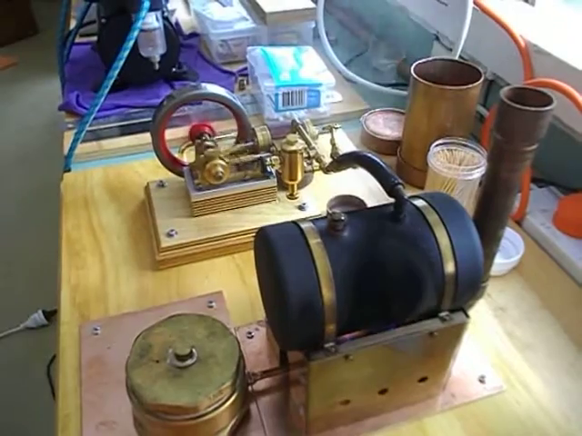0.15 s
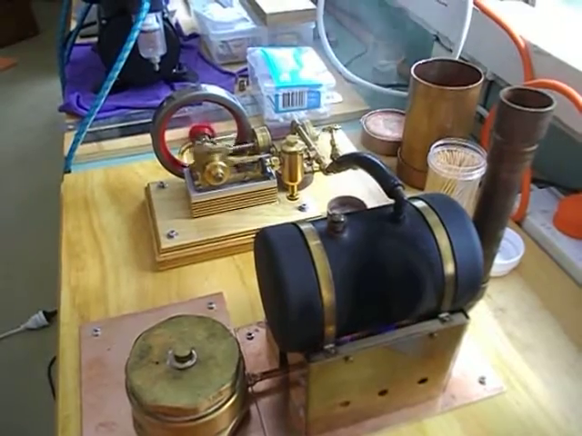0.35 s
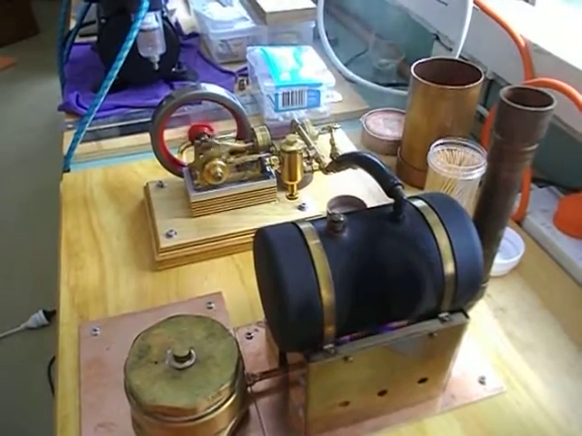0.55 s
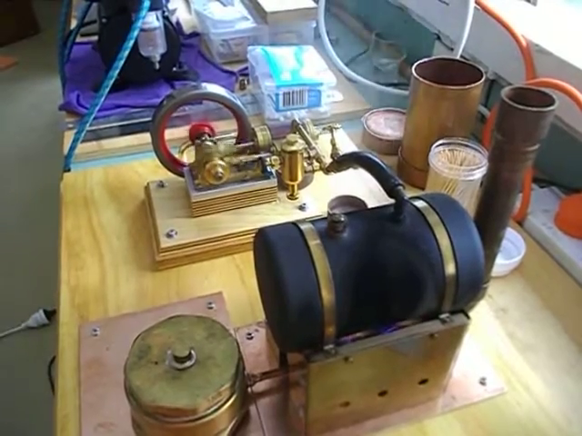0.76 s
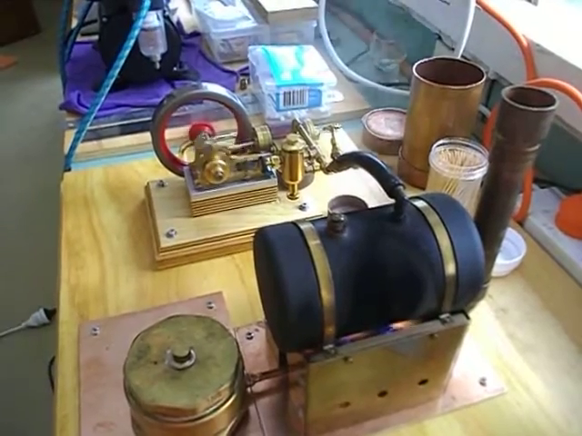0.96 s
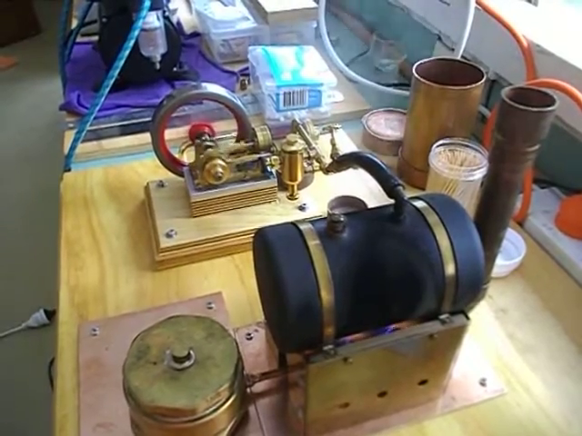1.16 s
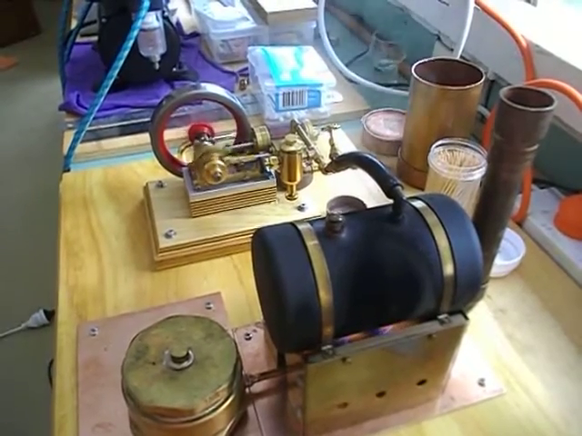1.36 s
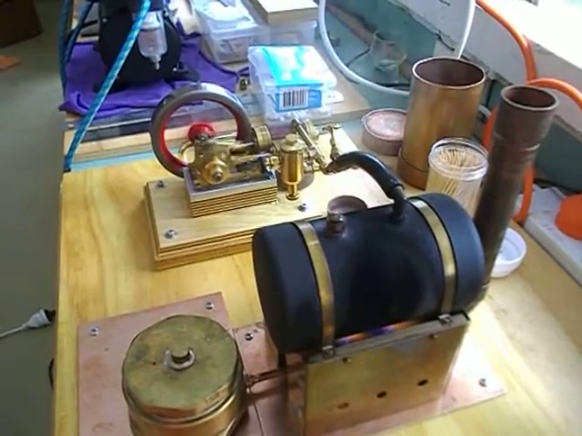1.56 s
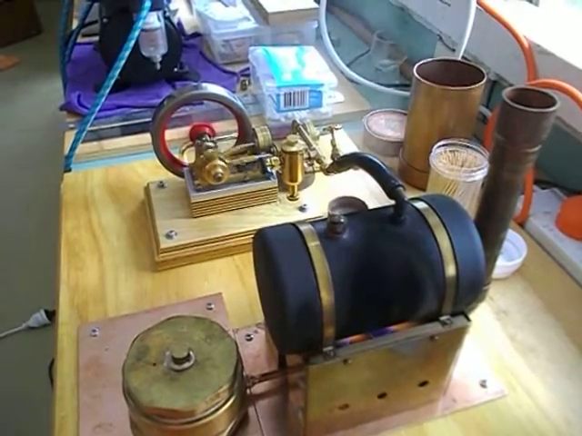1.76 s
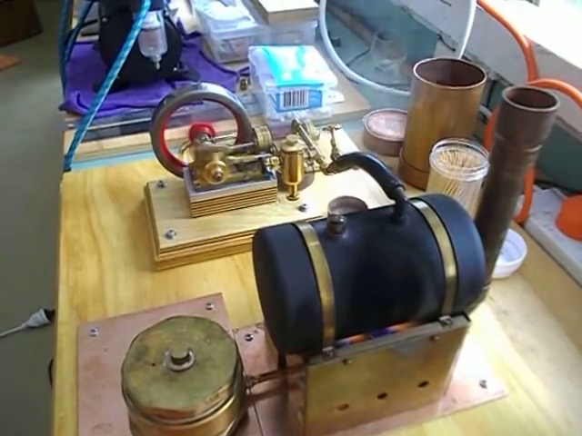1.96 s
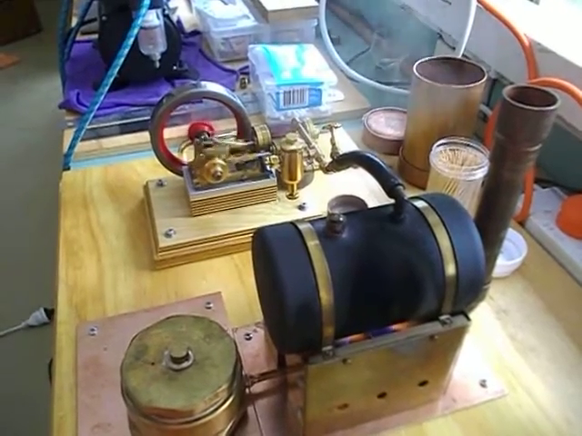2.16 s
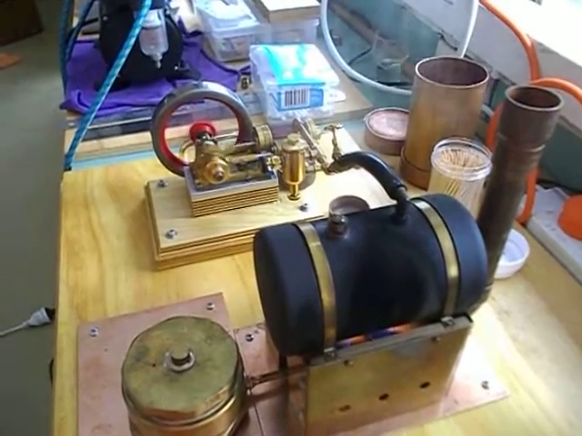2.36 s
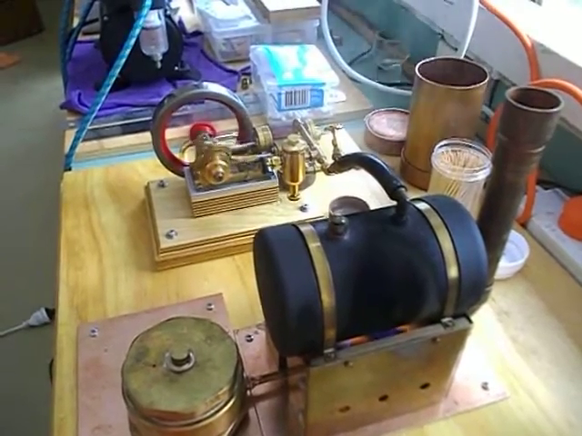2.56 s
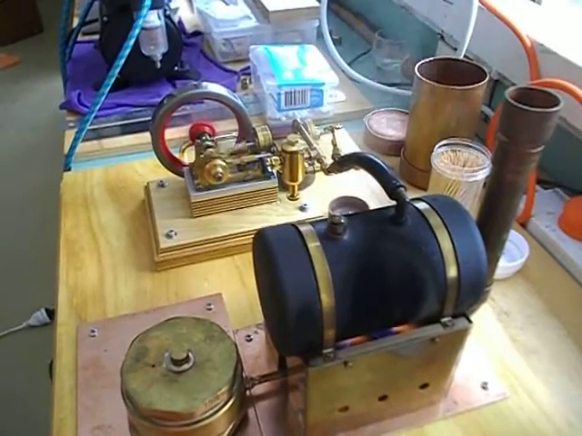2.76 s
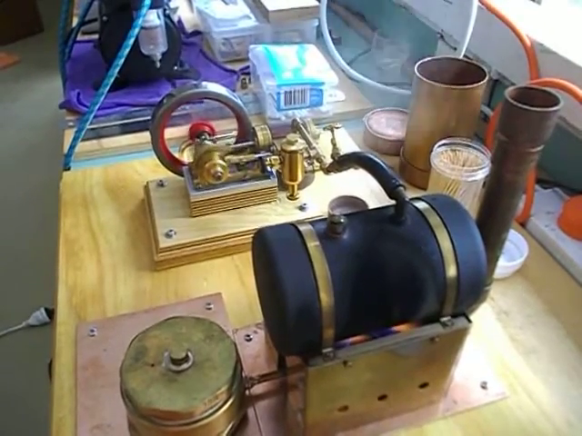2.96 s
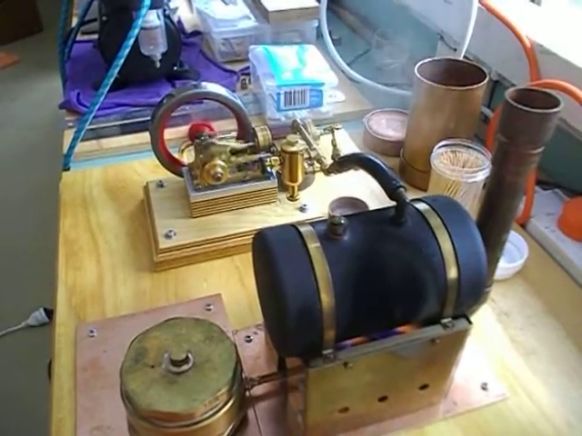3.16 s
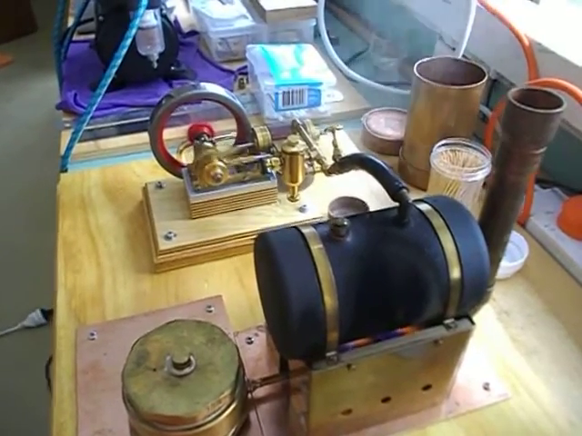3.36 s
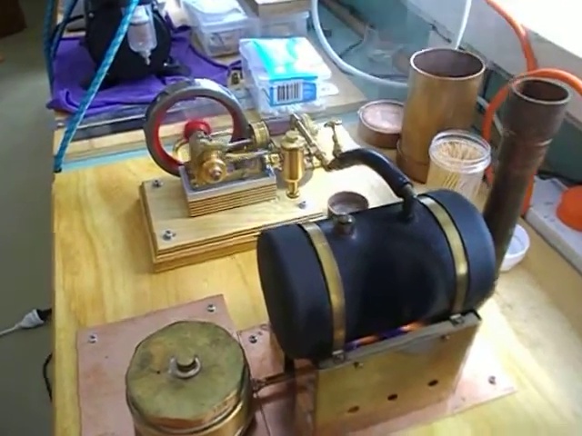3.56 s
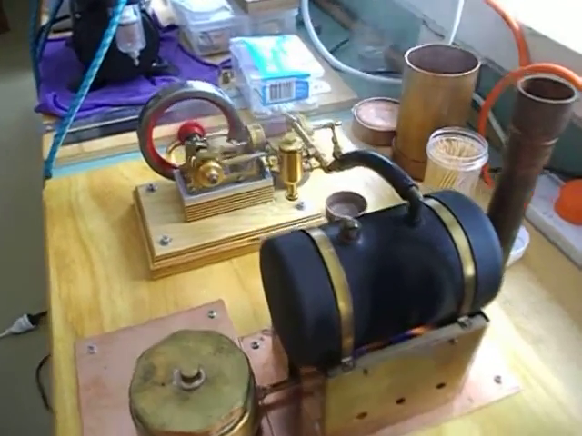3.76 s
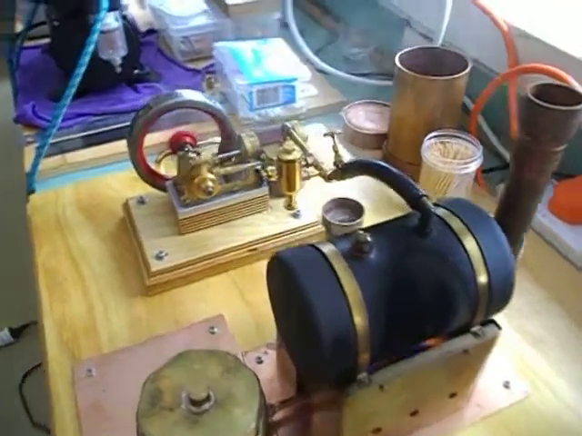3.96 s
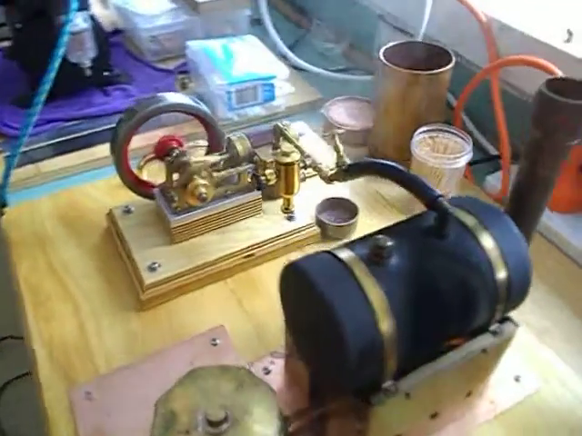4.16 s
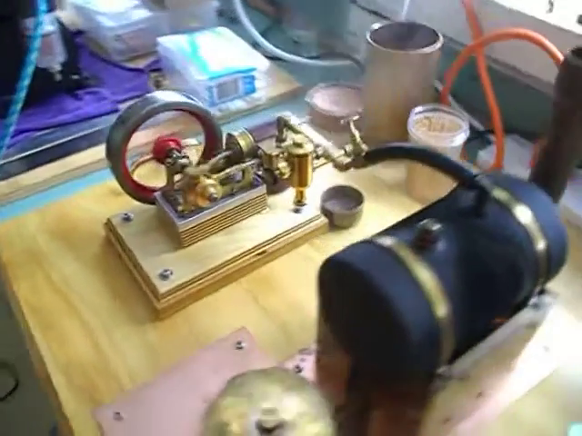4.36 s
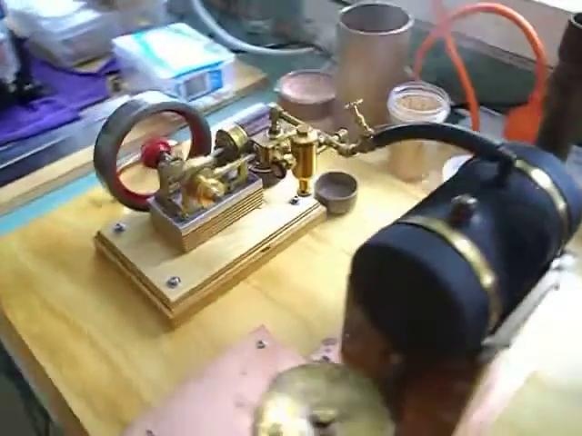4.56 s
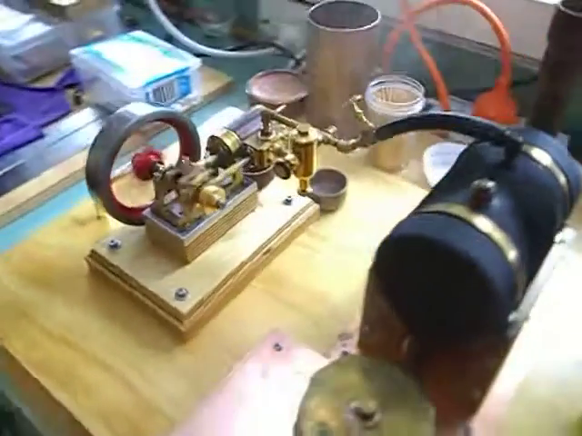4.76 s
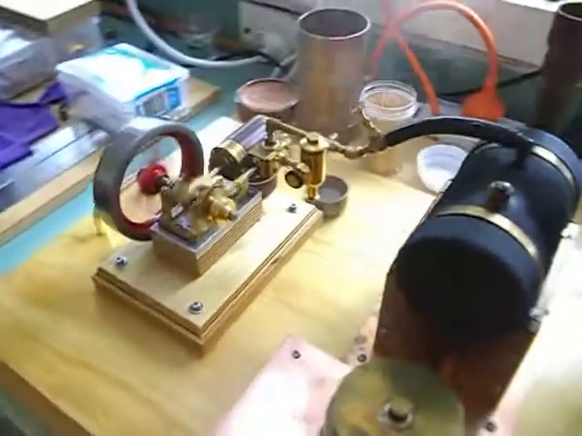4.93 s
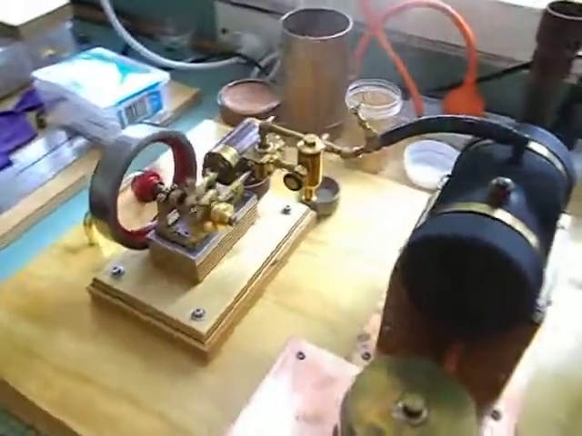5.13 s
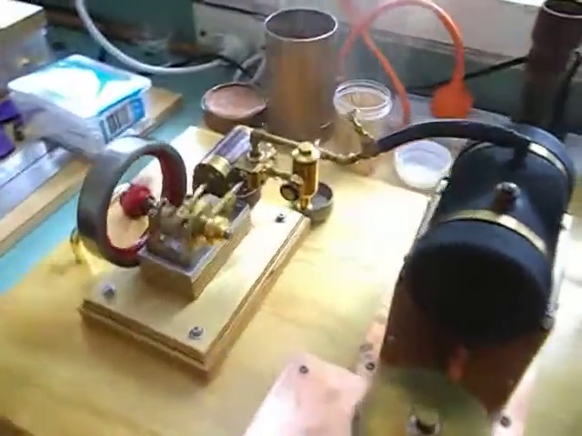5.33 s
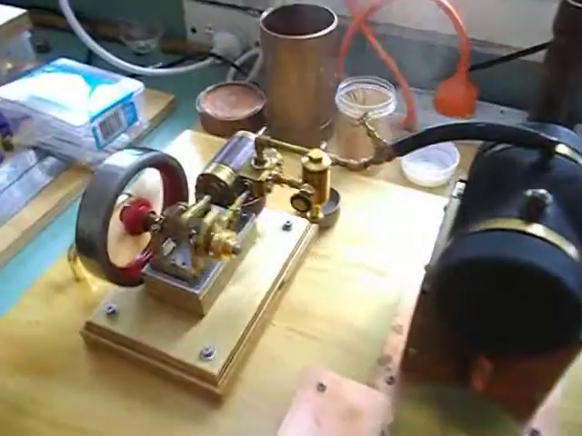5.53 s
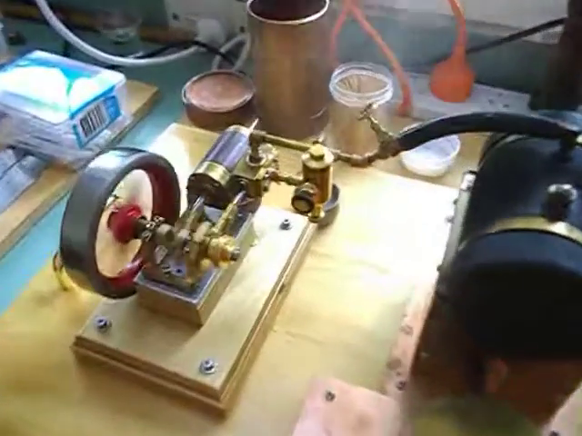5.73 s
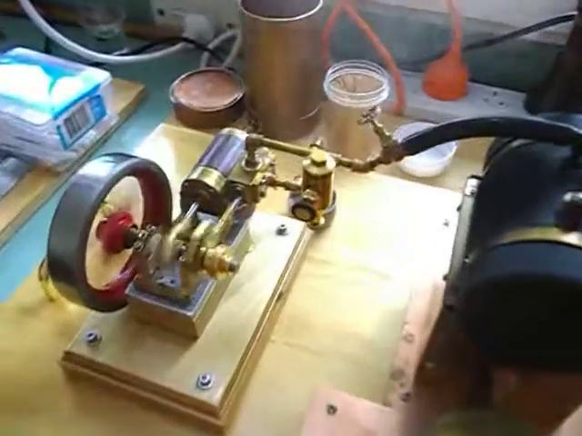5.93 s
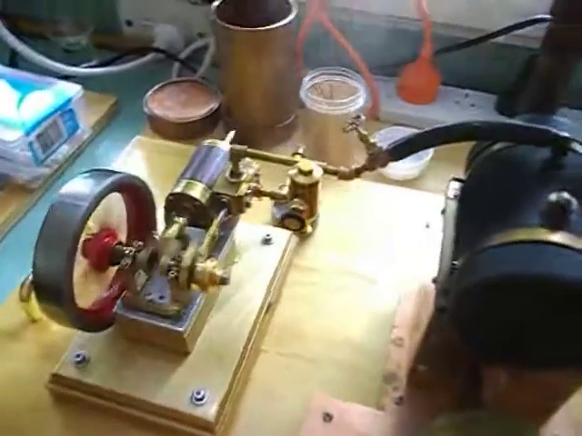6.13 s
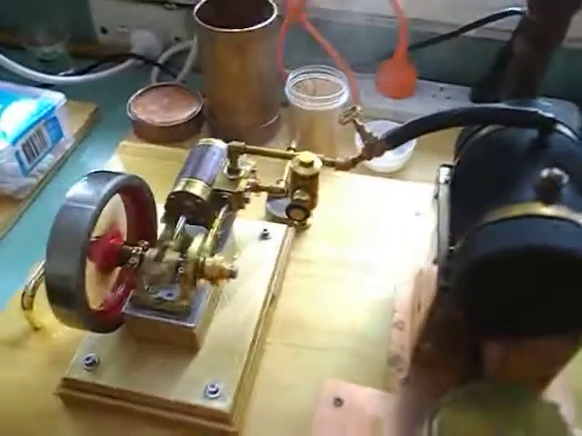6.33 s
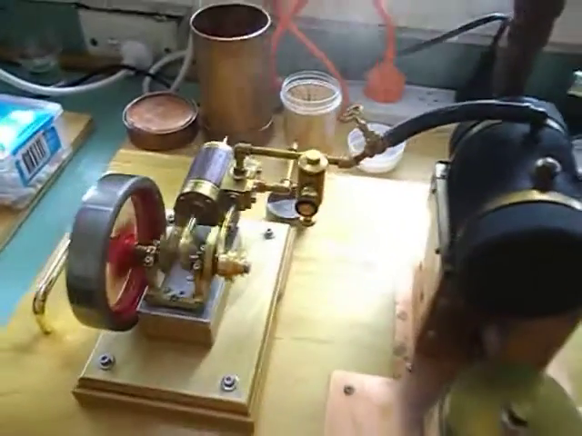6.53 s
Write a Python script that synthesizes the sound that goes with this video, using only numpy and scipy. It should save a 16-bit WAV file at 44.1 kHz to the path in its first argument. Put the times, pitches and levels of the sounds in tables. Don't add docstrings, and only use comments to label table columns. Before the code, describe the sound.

From the first moment a small steam engine is already running on a wooden bench, at roughly eight turns a second, and it never stops. Each turn brings a brief spitting puff of steam and two short, dry brass knocks, merging into a rapid chuffing clatter. Leaking steam hisses brightly throughout, pulsing slightly with the turns. Below lie a soft gas-flame roar, room rumble and a low, flickering flue drone. A thin steady high whistle swells faintly around 1.5 s and nearly vanishes by 4.2. Until about 3.8 s the sound is fairly distant and even. From 4 to 5 s the microphone moves round and closer: narrow tones in the hiss glide up and down, and sharp wet spits jump out around 4.5. From 5 to 6.6 s puffs are stronger, hiss fullest near 5.25 then easing, the speed almost unchanged; the drone rises at the end. Close, dull workshop reflections.

```python
import sys
import numpy as np
from scipy import signal
from scipy.fft import rfft, irfft, next_fast_len
from scipy.io import wavfile
from scipy.ndimage import uniform_filter1d

SR = 44100
rng = np.random.default_rng(int(sys.argv[2]) if len(sys.argv) > 2 else 0)


def generate_wav(signal):
    frames = np.transpose(np.atleast_2d(signal))
    scaled = np.clip(frames, -1, 1) * 32767
    pcm = np.round(scaled).astype(np.int16)
    wavfile.write(sys.argv[1], SR, pcm)


def volts(x):
    e = np.asarray(x, float) / 20
    return 10 ** e


N = 290619


def rms_one(x):
    return x / np.sqrt(np.mean(x ** 2) + 1e-20)


def in_time(rows):
    s, *columns = np.transpose(rows)
    return [np.interp(np.arange(N) / SR, s, c) for c in columns]


def drift(rate):
    r = np.exp(-40 * np.pi * rate / SR)
    slow = signal.lfilter([1], [1, -2 * r, r * r], rng.standard_normal(N // 20 + 2002))[2000:]
    return np.interp(np.arange(N) / 20, np.arange(len(slow)), rms_one(slow))


def white_spectra(count):
    return rfft(rng.standard_normal((count, 2 * next_fast_len(N // 2 + 1))))


def coloured(white, points, low_hz=0, high_hz=30000):
    hz = np.maximum(np.linspace(0, SR / 2, len(white)), 1)
    table = np.array(points)
    gain = volts(np.interp(np.log(hz), np.log(table[:, 0]), table[:, 1]))
    edges = np.clip(np.minimum(hz - low_hz, high_hz - hz) / 120 + .5, 0, 1)
    return rms_one(irfft(white * gain * np.sqrt(edges))[:N])


def resonance(x, hz, width):
    r = np.exp(-np.pi * width / SR)
    top = np.array([1, 0, -1]) * (1 - r * r) / 2
    return signal.lfilter(top, [1, -2 * r * np.cos(2 * np.pi * hz / SR), r * r], x)


def twice_resonant(x, hz, width):
    return resonance(resonance(x, hz, width), hz, width)


def ring(clicks, hz, t60):
    r, w = volts(-60 / (t60 * SR)), 2 * np.pi * hz / SR
    return signal.lfilter([0, np.sin(w)], [1, -2 * r * np.cos(w), r * r], clicks + 1e-18)


def ridge(rows, half_width_hz):
    hz, ridge_db = in_time(rows)
    low_pass = signal.butter(2, half_width_hz, fs=SR, output="sos")
    band = signal.sosfilt(low_pass, rng.standard_normal((2, N)))
    phase = 2 * np.pi * np.cumsum(hz) / SR
    flutter_db = 1.2 * drift(17)
    return volts(ridge_db + flutter_db) * rms_one(band[0] * np.cos(phase) + band[1] * np.sin(phase))


def workshop(x):
    t = np.arange(int(.15 * SR)) / SR
    tail = rng.standard_normal(len(t)) * volts(-60 * t / 0.16) * (t > .003)
    return signal.fftconvolve(x, tail / np.sqrt(np.sum(tail ** 2)))[:N]


# [t/s, f/Hz, level/dB, half length/s]
SWELLS = [(0.124, 169.8, -48, 0.15), (.6, 163.3, -54, .15), (1.3, 137, -55, 0.1), (1.4, 82.8, -47, 0.26),
          (2.2, 82.1, -40.5, .3), (2.55, 164.8, -48.5, 0.11), (3.4, 132.1, -51.5, 0.42),
          (4.703, 172, -53, 0.14), (5.251, 78.3, -47, .12), (5.949, 76.3, -46, 0.14),
          (6.056, 134, -56, .15), (6.308, 233, -53.5, 0.16), (6.469, 133.8, -44, 0.085)]


def singing():
    t, out = np.arange(N) / SR, np.zeros(N)
    for s, hz, db, half in SWELLS:
        out += np.sqrt(2) * volts(db) * np.exp(-((t - s) / half) ** 2) * np.sin(2 * np.pi * hz * t)
    return out


# [t/s, f/Hz, level/dB]
DRONE = [(0, 64.9, -38.5), (.4, 64.5, -35.5), (.71, 63.3, -37.5), (1.17, 66.3, -32.5), (1.5, 68, -38),
         (1.69, 68.74, -35.5), (1.85, 64.65, -41), (2.18, 65.2, -33.5), (2.83, 65, -33),
         (3.19, 64.2, -34.5), (3.52, 63.13, -32), (4.16, 65.13, -33), (4.68, 62.74, -35.5),
         (5.16, 63.3, -39.5), (5.56, 63.6, -32.5), (5.91, 69.34, -38.5), (6.22, 68.6, -30.5),
         (6.59, 73.2, -26)]
# [t/s, half length/s, depth/dB]
FALTERS = [(0.567, 0.081, 34), (0.967, 0.085, 15), (1.28, 0.024, 28), (1.608, 0.02, 14), (2.66, 0.097, 16),
           (3.861, 0.08, 10), (4.423, 0.11, 7.5), (4.746, 0.08, 1), (5.413, 0.065, 15), (5.626, 0.026, 10),
           (5.82, 0.039, 15), (6.059, 0.071, 20), (6.174, 0.02, 11), (6.268, 0.04, 12), (6.41, 0.049, 16),
           (6.556, 0.069, 21)]


def flue_drone():
    hz, drone_db = in_time(DRONE)
    for s, half, depth_db in FALTERS:
        drone_db = drone_db - depth_db * np.exp(-((np.arange(N) / SR - s) / half) ** 2)
    level = np.sqrt(2) * volts(drone_db - 3.8 + 2.4 * drift(12))
    return level * np.sin(2 * np.pi * np.cumsum(hz + 1.8 * drift(12)) / SR)


# [t/s, level/dB]
FLAME = [(0, -41), (.3, -42.5), (.9, -43), (1.36, -41.5), (2, -42.5), (2.5, -42), (3.7, -42), (5.85, -41),
         (6.08, -39.5), (6.59, -42)]
# [f/Hz, level/dB per Hz]
ROAR = [(120, -19), (200, -3.5), (398, -8), (514, -8.5), (623, -0.5), (833, -1), (1040, 0), (1180, -6.5),
        (1510, -14.5), (1850, -8), (2690, -8.5), (3000, -8.5), (3270, -13), (3600, -16.5), (4680, -5.5),
        (7920, -120)]
# [f/Hz, level/dB per Hz]
RUMBLE = [(5, -34), (12, -3.5), (22, -6.5), (30, -2.5), (50, -14), (100, -16), (150, -20.5), (200, -30),
          (300, -38.5), (500, -99)]
# [f/Hz, width/Hz, level/dB]
HUMS = [(67.95, 7.7, -47), (82.2, 8.7, -50), (137, 23.4, -51.5), (167.9, 18, -56), (234.7, 30, -63.5)]
# [f/Hz, width/Hz, depth/0-1]
NULLS = [(55, 5, .25), (152.3, 9.1, .8), (109, 10, 0.22)]


def burner():
    draught_db = in_time(DRONE)[1]
    draught_db = draught_db - draught_db.mean()
    for_roar, for_rumble = white_spectra(2)
    roar = volts(in_time(FLAME)[0] + 0.8 * drift(29)) * coloured(for_roar, ROAR)
    rumble_db = -39.8 + .3 * draught_db + 1.8 * drift(4.1)
    low = roar + volts(rumble_db) * coloured(for_rumble, RUMBLE, low_hz=-60)
    white = rng.standard_normal(N)
    for hz, width, db in HUMS:
        hum_db = db + 0.47 * draught_db + 1.4 * drift(2.0)
        low = low + volts(hum_db) * rms_one(twice_resonant(white, hz, width))
    for null_hz, width, depth in NULLS:
        low = low - np.clip(depth, 0, 1) * resonance(low, null_hz, width)
    return low + flue_drone() + singing()


# [t/s, level/dB]
GLAND = [
    (0, -53),
    (1.5, -48.5),
    (3.5, -50.5),
    (4.2, -61),
    (6.59, -58),
]


def gland():
    return ridge([(s, 3702, db) for s, db in GLAND], half_width_hz=92)


# [t/s, f/Hz, level/dB]
SWEEP = [(4.1, 9200, -60), (4.22, 9350, -41), (4.33, 9620, -37), (4.45, 9950, -38), (4.6, 10430, -42),
         (4.85, 10300, -43), (5.0, 10100, -41), (5.4, 10460, -55)]
# [t/s, f/Hz, level/dB]
SINKING = [(3.9, 6800, -60), (4.03, 6650, -38), (4.25, 6450, -42), (4.4, 6250, -33), (4.55, 6180, -37),
           (4.7, 6100, -37), (4.9, 5950, -58)]
# [t/s, f/Hz, level/dB]
STAYING = [(4.6, 6570, -60), (4.8, 6620, -41), (5.3, 6550, -42), (5.9, 6550, -38), (6.3, 6470, -36),
           (6.59, 6340, -41)]
# [t/s, f/Hz, level/dB]
SLIDING_HIGH = [(3.88, 9200, -60), (3.98, 9120, -41), (4.15, 8950, -38), (4.27, 8700, -39),
                (4.4, 8500, -58)]
SLIDING_LOW = [(3.85, 6150, -58), (3.97, 6000, -43), (4.15, 5800, -42), (4.3, 5720, -42), (4.42, 5700, -58)]


def passing_ridges():
    out = ridge(SWEEP, half_width_hz=140) + ridge(SINKING, half_width_hz=89)
    for rows in (STAYING, SLIDING_HIGH, SLIDING_LOW):
        out = out + ridge(rows, half_width_hz=110)
    return out


# [turn number, t/s at which the valve rod reverses]
CRANK = [
    (0, .0917),
    (25, 3.1799),
    (52, 6.5399),
]
# [t/ms from first knock, dull level/dB, bright level/dB]
STROKE = [(-31.5, -2.5, -0.5), (-11.5, -3, -3), (-14, 2.5, 4), (2.5, -1.5, 0.5), (19, 1, 1),
          (39.5, -3.5, 1.5), (48, -3.5, -2), (72, -3.5, -0.5), (92, 0.5, -0.5)]
# [f/Hz, level/dB per Hz]
LOW_FAR = [(2600, -47.0), (3270, -17.0), (3490, -9.0), (3700, -5.0), (4090, -11.0), (4260, -8.0),
           (5000, -12.0), (5340, -10.0), (5640, -3.0), (5860, -4.0), (6330, 0.0), (6800, -8.0),
           (6980, -9.0), (7320, -6.0)]
HIGH_FAR = [(7190, -4.0), (7410, -2.0), (7800, -5.0), (7920, -2.0), (8910, -3.0), (9040, 0.0), (9220, -1.0),
            (9470, -9.0), (10120, -8.0), (10510, -14.0), (11110, -9.0), (11540, -10.0), (12060, -6.0),
            (12360, -9.0)]
LOW_PASSING = [(2600, -47.0), (3270, -17.0), (3660, -14.0), (3830, -9.0), (4610, -13.0), (5340, -9.0),
               (5810, -4.0), (5940, -6.0), (6330, 0.0), (6500, -2.0), (6630, -6.0), (6800, -5.0),
               (7060, -7.0), (7320, -11.0)]
HIGH_PASSING = [(7190, -5.0), (7320, -7.0), (8230, -6.0), (8270, -5.0), (8830, -1.0), (9170, -3.0),
                (9260, -1.0), (9470, 0.0), (10030, -3.0), (10420, -11.0), (10680, -12.0), (11630, -8.0),
                (12270, 0.0), (12360, -1.0)]
LOW_BESIDE = [(2600, -51.0), (3270, -21.0), (3660, -14.0), (4350, -10.0), (4570, -12.0), (5120, -7.0),
              (5560, -7.0), (5860, -1.0), (6290, -6.0), (6500, 0.0), (6680, -2.0), (6930, -8.0),
              (7150, -7.0), (7320, -11.0)]
HIGH_BESIDE = [(7190, -1.0), (7360, -6.0), (7580, -7.0), (7750, -5.0), (8660, -2.0), (9040, -4.0),
               (9260, -1.0), (9470, -2.0), (10160, -2.0), (10380, -4.0), (11540, 0.0), (11630, -2.0),
               (12320, 0.0), (12360, -1.0)]
LOW_BEHIND = [(2600, -48.0), (3270, -18.0), (3490, -14.0), (3880, -11.0), (3960, -12.0), (4780, -11.0),
              (5000, -8.0), (5340, -12.0), (5680, -5.0), (5990, -9.0), (6370, -1.0), (6500, 0.0),
              (7020, -10.0), (7320, -12.0)]
HIGH_BEHIND = [(7190, -6.0), (8530, -1.0), (8740, -4.0), (8960, 0.0), (9300, -6.0), (9600, -2.0),
               (10080, -10.0), (10340, -4.0), (10640, -4.0), (10810, -9.0), (11070, -8.0), (11630, -1.0),
               (11970, -9.0), (12360, -3.0)]


def leak(place, levels_db):
    turns, reversals = np.transpose(CRANK)
    knock_s = np.interp(np.arange(turns[-1] + 1), turns, reversals) - .0421
    now = np.arange(N) / SR
    turn = np.clip(np.searchsorted(knock_s - .04, now) - 1, 0, len(knock_s) - 1)
    since_ms = (now - knock_s[turn]) * 1000
    ms, dull_db, bright_db = np.transpose(STROKE)
    pulse_db = [np.interp(since_ms, ms, db) for db in (dull_db, bright_db, bright_db)]
    sputter_db = .5 * drift(40) + .3 * drift(150)
    white = white_spectra(4)
    shares = [np.sqrt(np.clip(1 - abs(place - k), 0, 1)) for k in range(4)]
    lower = (LOW_FAR, LOW_PASSING, LOW_BESIDE, LOW_BEHIND)
    upper = (HIGH_FAR, HIGH_PASSING, HIGH_BESIDE, HIGH_BEHIND)
    slices = [(lower, 0, 5300), (lower, 5300, 7250), (upper, 7250, 30000)]
    out = 0
    for (spectra, low_hz, high_hz), level_db, stroke_db in zip(slices, levels_db, pulse_db):
        jet = 0
        for share, noise, points in zip(shares, white, spectra):
            jet = jet + share * coloured(noise, points, low_hz, high_hz)
        out = out + volts(level_db + stroke_db + sputter_db + .8 * drift(45)) * jet
    return out


# [t/s at its height, level/dB]
PUFFS = [(0.0389, -25), (0.1633, -19.5), (0.286, -21.5), (0.4101, -28), (0.5318, -23.5), (0.6588, -23),
         (0.7804, -20.5), (0.9045, -21.5), (1.0271, -20.5), (1.1538, -30), (1.2765, -20), (1.3978, -19.5),
         (1.523, -20.5), (1.644, -17.5), (1.7685, -22), (1.8926, -21.5), (2.0149, -23), (2.1389, -24),
         (2.2624, -23), (2.3866, -22), (2.5096, -20.5), (2.6312, -21.5), (2.7552, -19), (2.8803, -19),
         (3.006, -21), (3.1309, -25), (3.2483, -25), (3.377, -20.5), (3.499, -17.5), (3.6223, -30),
         (3.749, -21.5), (3.8723, -22.8), (3.9992, -20), (4.1231, -20), (4.2466, -25), (4.375, -20.5),
         (4.4915, -15), (4.6206, -20), (4.7497, -26.8), (4.8677, -36), (4.9981, -17.5), (5.1161, -16),
         (5.2454, -15), (5.369, -20), (5.4953, -15), (5.6164, -17.5), (5.7405, -15.5), (5.8654, -16.5),
         (5.9887, -16), (6.1157, -17), (6.2397, -17), (6.3649, -19), (6.4883, -18)]
# [t/s, peak level/dB]
SPITS = [(0.0594, -18), (1.5464, -19), (1.6671, -16), (1.7149, -18), (1.8114, -20), (1.9154, -19),
         (2.6574, -20), (3.2767, -21), (3.4617, -23), (3.6694, -18), (4.2766, -16), (4.4494, -18),
         (4.5236, -7), (4.6514, -11), (4.7074, -16), (4.7724, -11), (4.9334, -14), (5.1934, -18),
         (5.3896, -18), (5.4414, -11), (5.5182, -8), (5.8875, -13), (6.0114, -13), (6.068, -22)]
# [f/Hz, width/Hz, level/dB]
PUFF_FAR = [(5800, 230, -24), (6150, 520, 6), (8280, 420, 1.5), (9130, 200, 3.5), (10260, 330, -18),
            (11300, 990, -31)]
PUFF_NEAR = [(5200, 390, -23), (5710, 280, 11.5), (6440, 550, 12.5), (7300, 160, -12), (8900, 890, 5),
             (9700, 542, -3), (10200, 960, -1), (11600, 1000, 3)]


def valve_jet(white, peaks):
    out = np.zeros(N)
    for k, (hz, width, db) in enumerate(peaks):
        out += (-1) ** k * volts(db) * twice_resonant(white, hz, 1.5 * width)
    return rms_one(out)


def puffs(near):
    spit_lag_s, spit_loss_db, lead_s = 0.0046, 11, .0015
    s, puff_db = np.transpose(PUFFS + [(s + spit_lag_s, db - spit_loss_db) for s, db in SPITS])
    around = np.arange(-600, 900)
    ms = around / SR * 1000
    swell = np.exp(-(ms / np.where(ms < 0, 6.5, 5.5)) ** 2)
    spit = np.exp(-((ms + .7) / np.where(ms < -.7, 1.0, 1.7)) ** 2)
    wetness = np.clip((puff_db[:, None] + 18) / 11.4, .1, 1.3)
    at = ((s - lead_s) * SR).astype(int)[:, None] + around
    gate = np.zeros(N)
    np.add.at(gate, np.clip(at, 0, N - 1), volts(puff_db - 5.5)[:, None] * (.9 * swell + 1.2 * wetness * spit))
    white = rng.standard_normal(N)
    jet = np.sqrt(1 - near) * valve_jet(white, PUFF_FAR) + np.sqrt(near) * valve_jet(white, PUFF_NEAR)
    return gate * jet / np.sqrt(uniform_filter1d(jet ** 2, size=260))


# [t/s, level/dB]
STEAM = [(0, -28.5), (.5, -29), (1.5, -29.5), (2.5, -29.5), (3, -29), (3.8, -29), (4.1, -30), (4.45, -29),
         (4.8, -26.5), (5.25, -24.5), (5.6, -26), (6, -27.5), (6.59, -28.5)]
# [microphone place, dull level/dB, middle level/dB, bright level/dB]
BALANCE_AT = [
    (0, -8.5, -5, -2),
    (1, -6.5, -3, 4),
    (2, -9, -4, 1.5),
    (3, -7, -4, 2.5),
]
# [t/s, depth/0-1]
CANCEL = [(0, 0.17), (4.9, 0), (5.15, .5), (5.45, .4), (5.65, .75), (5.85, 0.3), (6.05, 0), (6.59, 0)]


def steam(place, near):
    steam_db, = in_time(STEAM)
    slices_db = [steam_db + np.interp(place, np.arange(4), db) for db in np.transpose(BALANCE_AT)[1:]]
    out = puffs(near) + leak(place, slices_db) + passing_ridges() + gland()
    return out - np.clip(in_time(CANCEL)[0], 0, 1) * resonance(out, 7420, 220)


# [t/s, f/Hz, level/dB, rise/s, t60/s]
BOOMS = [(.275, 1012, -27.5, 0.013, 0.15), (1.105, 1007, -27, 0.015, 0.15), (5.27, 1250, -33, .01, .1),
         (5.76, 690, -28, .01, 0.09), (3.637, 930, -32, 0.0019, .04), (3.888, 680, -29, .002, .04),
         (1.284, 935, -25, 0.00089, 0.035), (4.631, 680, -19.5, 0.0013, 0.019),
         (6.1, 759, -41, .002, 0.041), (5.793, 693, -32, 0.0022, .05)]


def board():
    out, age = np.zeros(N), np.arange(5000) / SR
    for s, hz, db, rise, t60 in BOOMS:
        at = int(s * SR)
        swell = 1 - np.exp(-age / rise)
        out[at:at + len(age)] += volts(db - 60 * age / t60) * swell * np.sin(2 * np.pi * hz * age)
    return out


# [f/Hz, t60/s, first knock level/dB far, near, second knock level/dB far, near]
FRAME = [(660, 0.02, -16, -5, -3, 5), (980, 0.018, 0, -8, -21, -9), (1057, 0.018, -2, -5, 3, 4),
         (1290, 0.012, -11, -20, -6, -16), (1820, 0.018, -2.5, -33, -16, -18),
         (1840, 0.017, -9, -33, 3, -17), (2010, 0.008, -12, -25, -25, -4), (2190, 0.012, 0, -17, -5, -1),
         (2390, 0.008, -7, -3, -8, 0), (2760, 0.008, 0, 3.5, -22, -5), (2983, 0.014, 4, -3, 0.5, -12),
         (3030, 0.017, -3, -10, 0.5, -8), (3330, 0.007, -27, 3, -26, -8),
         (3670, 0.0099, -21, 1.5, -22, -13)]


def knocks(rows, contacts, mode_db, near, scatter_db):
    times, level_db = np.transpose(rows)
    contact_ms, each_db, scatter_ms = np.transpose(contacts)
    offsets_ms = contact_ms + scatter_ms * rng.standard_normal((len(times), len(contacts)))
    at = np.clip(((times[:, None] + offsets_ms / 1000) * SR).astype(int), 0, N - 1)
    contact_db = level_db[:, None] + each_db - 5.5
    out = np.zeros(N)
    for (hz, t60, *_), (far_db, near_db) in zip(FRAME, mode_db):
        clicks = np.zeros(N)
        spread_db = scatter_db * rng.standard_normal(at.shape)
        np.add.at(clicks, at, -volts(contact_db + far_db + (near_db - far_db) * near[at] + spread_db))
        out += ring(clicks, hz, t60)
    crack_far_db, crack_near_db, crack_ms = -9.0, -7.0, 4.0
    clicks = np.zeros(N)
    np.add.at(clicks, at, volts(contact_db + crack_far_db + (crack_near_db - crack_far_db) * near[at]))
    burst = np.hanning(int(crack_ms * SR / 1000)) ** .5
    envelope = np.convolve(clicks, burst)[30:N + 30]
    band = signal.butter(3, [1750, 3300], "band", fs=SR, output="sos")
    return out + envelope * rms_one(signal.sosfilt(band, rng.standard_normal(N)))


# [t/s, level/dB]
BIG_END = [(0.051, -30.5), (0.1734, -27.5), (0.2973, -30), (0.419, -30.5), (0.5437, -29.5), (0.6668, -28.5),
           (0.7893, -29.5), (0.913, -29.5), (1.0372, -28.6), (1.1601, -31.5), (1.2843, -30), (1.4075, -32),
           (1.5312, -29), (1.655, -30), (1.7767, -33.5), (1.9008, -29.5), (2.0244, -30), (2.1476, -29),
           (2.2717, -29.5), (2.3955, -29), (2.5197, -31), (2.6434, -28.5), (2.7675, -30), (2.891, -29),
           (3.0146, -32), (3.1382, -32.5), (3.2614, -31.5), (3.3857, -30), (3.5098, -30), (3.6347, -29),
           (3.7593, -28.5), (3.883, -27.5), (4.0077, -25.5), (4.1317, -23.5), (4.2558, -23.5),
           (4.3818, -24), (4.5054, -25.5), (4.6311, -26), (4.7539, -26), (4.8783, -27.5), (5.0037, -27),
           (5.1268, -27.5), (5.2519, -26), (5.3774, -28), (5.5016, -26), (5.6266, -27), (5.7512, -26.5),
           (5.8753, -28), (6.0001, -26.5), (6.1239, -30), (6.2479, -32), (6.3721, -29), (6.4973, -29)]
# [t/s, level/dB]
LOOSE_TICKS = [
    (5.288, -30),
]
# [t/s, level/dB]
VALVE_ROD = [(0.0912, -27), (0.2147, -26), (0.3387, -27), (0.4621, -26.5), (0.5855, -26.5), (0.7091, -27.5),
             (0.8324, -28), (0.9558, -26.5), (1.0793, -27.5), (1.2024, -29.1), (1.3259, -28.5),
             (1.4494, -26.5), (1.573, -27), (1.6964, -26), (1.8204, -26.5), (1.9439, -27.5), (2.0672, -26),
             (2.191, -28), (2.3148, -28), (2.4382, -27.5), (2.5621, -26), (2.6854, -27.5), (2.8089, -27),
             (2.9329, -27), (3.056, -30), (3.18, -27.5), (3.304, -27.5), (3.4279, -28), (3.5524, -28),
             (3.6766, -27), (3.8014, -26), (3.926, -24), (4.0507, -27), (4.1749, -24), (4.2997, -26),
             (4.4241, -27.5), (4.5485, -27), (4.6731, -29), (4.7976, -26), (4.9222, -29), (5.0464, -31),
             (5.171, -29.5), (5.2953, -31.5), (5.42, -29.5), (5.5444, -31), (5.6687, -29), (5.7932, -25),
             (5.9179, -28.5), (6.0421, -27), (6.1668, -27.5), (6.2909, -32), (6.4157, -29), (6.5401, -29.5)]
# [t/ms, level/dB, scatter/ms]
FIRST_CONTACTS = [
    (-1.6, -12, 0.3),
    (-.2, -1.5, 0.15),
    (1.6, -4, .5),
]
SECOND_CONTACTS = [
    (-1.184, -2, 0),
    (1.4, -10, .7),
]


def linkage(near):
    frame = np.array(FRAME)
    first = knocks(BIG_END + LOOSE_TICKS, FIRST_CONTACTS, frame[:, 2:4], near, scatter_db=1.3)
    second = knocks(VALVE_ROD, SECOND_CONTACTS, frame[:, 4:6], near, scatter_db=1.1)
    return signal.sosfilt(signal.butter(4, 520, "high", fs=SR, output="sos"), first + second)


# [t/s, place: 0 far, 1 passing, 2 beside, 3 behind the cylinder]
PLACE = [(0, 0), (3.75, 0), (4.3, 1), (4.5, 1.5), (4.95, 2), (5.7, 2), (6.1, 4.5), (6.59, 3)]


def scene():
    place = np.clip(in_time(PLACE)[0], 0, 3)
    near = np.minimum(place / 2, 1)
    metal = linkage(near) + board()
    return (burner() + steam(place, near) + metal + volts(-13.5) * workshop(metal))[None]


def top_cut(x):
    return signal.sosfilt(signal.butter(12, 12710, fs=SR, output="sos"), x)


# [f/Hz, level/dB]
MICROPHONE = [(10500, 0), (10750, -3), (11040, -15), (11340, -11), (11950, -22), (12380, -37), (12430, -54),
              (12700, -56)]


def record(dry):
    size = next_fast_len(N)
    colour = volts(np.interp(np.fft.rfftfreq(size, 1 / SR), *np.transpose(MICROPHONE)))
    mix = irfft(rfft(dry, size) * colour, size)[:, :N]
    return top_cut(mix)


dry = scene()
out = record(dry)
generate_wav(out)
```